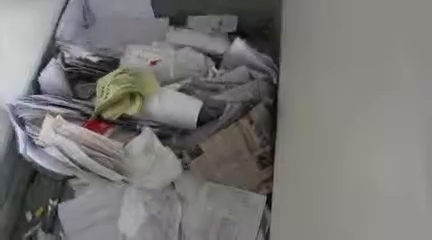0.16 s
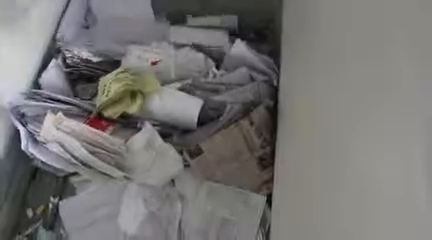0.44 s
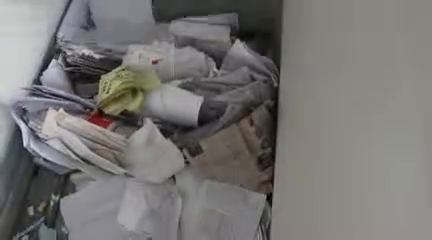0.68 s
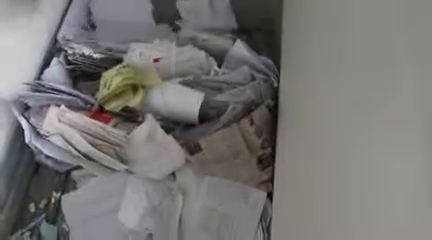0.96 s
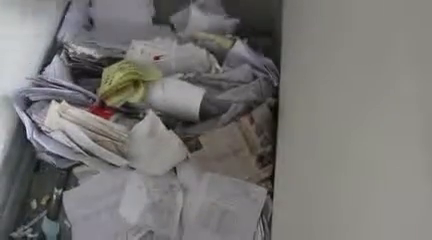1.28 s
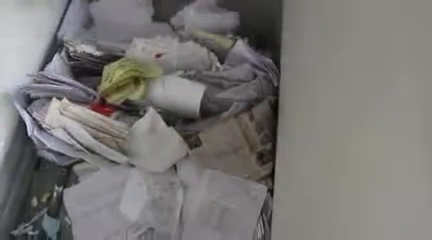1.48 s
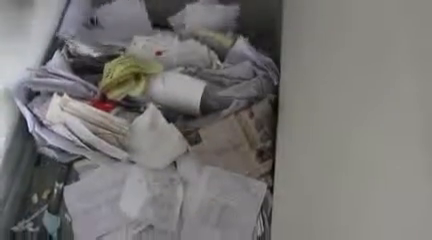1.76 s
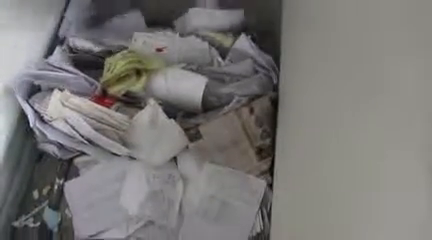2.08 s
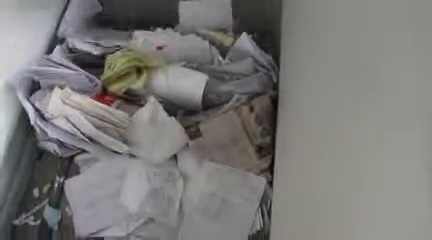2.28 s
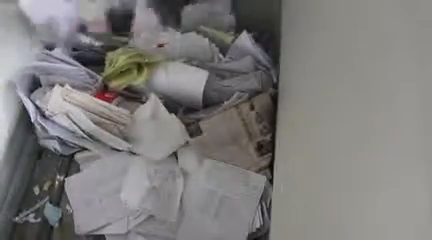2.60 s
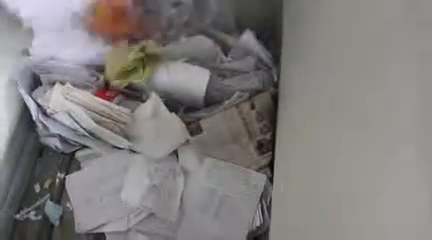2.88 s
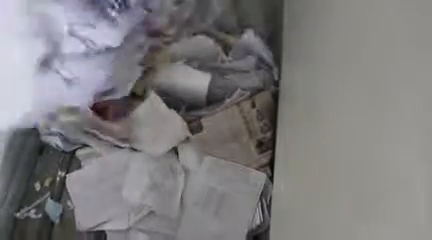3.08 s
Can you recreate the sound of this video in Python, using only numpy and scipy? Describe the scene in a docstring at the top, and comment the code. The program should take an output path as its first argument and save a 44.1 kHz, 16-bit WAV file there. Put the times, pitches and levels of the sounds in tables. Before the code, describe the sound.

An industrial paper shredder roars steadily, crunching and tearing paper over a deep rumbling frame.

```python
"""Factory hall: an industrial paper shredder runs, heard from beside the feed belt, a little to the left.
The drive shakes the steel frame into a rumble, noise that swells in its resonances; short low tones hum in it.
Motor, gears and tearing make a steady broadband roar; the cutters bite in crunches, bursts of random snaps.
A rubbing steel part sings high, friction noise through resonances, swelling about once a second;
paper rustles as high noise, and stiff sheets crack in sudden, decaying bursts of it."""
import sys
import numpy as np
from scipy import signal
from scipy.fft import rfft, irfft, next_fast_len
from scipy.io import wavfile
from scipy.ndimage import uniform_filter1d, map_coordinates

SR = 44100
rng = np.random.default_rng(int(sys.argv[2]) if len(sys.argv) > 2 else 0)


def transcribe(signal):
    """Save signal, clipped to [-1, 1], as a 16-bit WAV file at the path in sys.argv[1]."""
    frames = np.atleast_2d(signal).T
    limited = np.clip(frames, -1, 1)
    pcm = np.round(limited * 32767).astype(np.int16)
    wavfile.write(sys.argv[1], SR, pcm)


def ratio(d):
    """dB to gain"""
    e = np.asarray(d, float) / 20
    return 10 ** e


N = 143325  # samples

# Rubbing over time, before each layer's trim: t/s, singing steel level/dB, paper rustle level/dB
RUBBING = [(0.0, -37, -51), (0.09, -42, -53), (0.32, -33, -49), (0.37, -37.5, -50), (0.9, -48, -59),
           (0.95, -65, -46), (0.96, -40, -51), (1.14, -37.5, -52), (1.52, -35, -49.5), (1.64, -39, -56),
           (1.71, -37.5, -49), (2.04, -55, -58), (2.39, -38.5, -43.5), (3.03, -43, -52), (3.09, -37.5, -55),
           (3.25, -41, -57)]


def unit(x):
    """Normalisation: divide a signal by its root mean square, giving rms 1."""
    return x / np.sqrt(np.mean(x ** 2) + 1e-20)


def along(points, hz):
    """Logarithmic frequency scale: interpolate (f/Hz, value) points along it."""
    f, values = np.transpose(points)
    return np.interp(np.log(hz + 1), np.log(f + 1), values)


def curves(rows):
    """Envelopes: linear interpolation in time, one curve for each column after t/s."""
    seconds, *columns = np.transpose(rows)
    t = np.arange(N) / SR
    return [np.interp(t, seconds, column) for column in columns]


def wobble(rate):
    """Slow random modulation: a spline through Gaussian knots, rate of them a second."""
    knots = rng.standard_normal(int(N * rate / SR) + 4)
    return map_coordinates(knots, [np.arange(N) * rate / SR])


def filtered(x, response):
    """Linear filtering: the spectrum is multiplied by a response of frequency in Hz."""
    size = next_fast_len(N + SR // 2)
    hz = np.fft.rfftfreq(size, 1 / SR)
    return irfft(rfft(x, size) * response(hz), size)[..., :N]


def spread(pair, gain):
    """Interchannel coherence: two unrelated signals are coloured and mixed to left and right of rms 1."""
    # Left-right correlation: f/Hz, correlation (1 = identical)
    likeness = [(40, .93), (120, .97), (250, .95), (700, .86), (1500, .73), (3000, .55), (8000, .36)]

    def mid_side_gain(hz):
        angle = np.arccos(np.clip(along(likeness, hz), -1, 1)) / 2
        return gain(hz) * np.array([np.cos(angle), np.sin(angle)])

    mid, side = filtered(pair, mid_side_gain)
    return unit(np.array([mid + side, mid - side]))


def noise(patchy_db):
    """Nonstationary noise: two channels share random gains over patches of time and frequency."""
    spectra = signal.stft(rng.standard_normal((2, N)), nperseg=512)[2]
    field = rng.standard_normal(spectra.shape[1:])
    field = uniform_filter1d(field, 6, 0)  # across frequency
    field = uniform_filter1d(field, 10, 1)  # across time
    return signal.istft(spectra * ratio(patchy_db * unit(field)), nperseg=512)[1][:, :N]


def peaks(modes):
    """Modal resonance: band-pass responses (centre, width, dB) add in power to one gain."""
    def gain(f):
        power = 0
        for centre, width, db in modes:
            damping = (f * width) ** 2
            power = power + ratio(2 * db) * damping / ((centre ** 2 - f ** 2) ** 2 + damping)
        return np.sqrt(power)
    return gain


def snaps(per_s, spread_db):
    """Impulsive noise: two streams of clicks at random times, with widely scattered sizes."""
    hit = rng.random((2, N)) < per_s / SR
    scatter = ratio(spread_db * rng.exponential(size=(2, N)))
    return unit(hit * rng.standard_normal((2, N)) * scatter)


def steady(x):
    """Short-time power normalisation: part of a narrow noise's chance swells is evened out."""
    window_s, share = 0.12, 0.67  # share 1 would even them fully
    power = uniform_filter1d(np.mean(x ** 2, axis=0), round(window_s * SR))
    return unit(x / (np.abs(power) + 1e-3) ** (share / 2))


def frame():
    """Forced vibration: the drive shakes the frame, whose deep, upper and panel modes swell apart."""
    # Rumble surges: t/s, deep level/dB, upper level/dB
    rumble = [(0.0, -38, -23.5), (0.04, -22.5, -21), (0.15, -25.5, -26), (0.28, -27.5, -28),
              (0.33, -18, -21), (0.54, -28.5, -25), (0.59, -24, -20), (0.69, -17.5, -21.5),
              (0.72, -26, -27.5), (0.94, -24.5, -20.5), (0.97, -20.5, -23), (1.42, -22, -23.5),
              (1.68, -23, -19.5), (1.81, -22.5, -31.5), (1.88, -23, -20), (1.96, -19, -20.5),
              (1.99, -23, -24.5), (2.63, -22.5, -21), (2.73, -27.5, -17.5), (2.81, -24.5, -24.5),
              (3.25, -22, -21)]
    # Rattling panels, before the trim: t/s, level/dB
    rattle = [(0.0, -24.5), (0.27, -28), (0.32, -23), (0.56, -29), (0.63, -25), (0.75, -32), (0.85, -23),
              (2.07, -29), (2.21, -22.5), (2.24, -34), (2.42, -25), (2.43, -22.5), (2.88, -36),
              (3.25, -21.5)]
    # Frame resonances: f/Hz, width/Hz, relative level/dB
    modes = [(60, 10.8, -3.5), (124.3, 9.2, 3.5), (147.4, 12, 5), (175.7, 5.6, 3.5), (214.7, 12.6, -4),
             (238.3, 13.7, -3), (268.7, 34, -2.5), (300.7, 11.2, 2), (317.6, 9.6, 0.5), (431.5, 15, -14),
             (585, 62, -15.5), (746, 12.6, -12), (956.5, 33, -16)]
    split_hz, panel_hz, panel_trim_db = 192, 400, -5.0
    deep_db, upper_db = curves(rumble)
    panel_db, = curves(rattle)
    deep_modes = [m for m in modes if m[0] < split_hz]
    upper_modes = [m for m in modes if split_hz <= m[0] < panel_hz]
    panel_modes = [m for m in modes if m[0] >= panel_hz]
    deep = steady(spread(rng.standard_normal((2, N)), peaks(deep_modes)))
    upper = steady(spread(rng.standard_normal((2, N)), peaks(upper_modes)))
    panels = spread(noise(patchy_db=2.16), peaks(panel_modes))
    return ratio(deep_db) * deep + ratio(upper_db) * upper + ratio(panel_db + panel_trim_db) * panels


def roar():
    """Incoherent superposition: motor, gears and tearing blend into broadband noise."""
    # Colour of the roar: f/Hz, relative density/dB per Hz
    colour = [(250, -33), (420, -1.5), (962, -2), (1430, -5.5), (2970, -6), (4470, -15), (5700, -20),
              (7180, -26), (8010, -27), (10100, -48), (10800, -54), (22000, -120)]
    # Slow course of the roar: t/s, level/dB
    course = [(0.0, -29), (1.07, -27.5), (2.53, -27), (3.25, -28)]
    level_db, = curves(course)
    level_db = level_db + 1.12 * wobble(14)
    return ratio(level_db) * spread(noise(patchy_db=1.84), lambda hz: ratio(along(colour, hz)))


def cutters():
    """Fracture and reverberation: bites snap fibres in fast-rising bursts that ring on in the hall."""
    # Cutter bites, before trim and envelope: t/s, level/dB, decay length of the power/s
    bites = [(0.0, -11.5, 0.041), (0.192, -20.5, 0.01), (0.274, -16.5, 0.14), (0.401, -12.5, 0.038),
             (0.584, -11.5, 0.056), (0.644, -12, 0.031), (0.796, -19, 0.034), (1.0784, -12, 0.019),
             (1.165, -17.5, 0.063), (1.335, -14.5, 0.038), (1.45, -13.5, 0.061), (1.628, -11, 0.048),
             (1.69, -19, 0.11), (1.862, -14, 0.051), (1.946, -15, 0.028), (2.119, -13, 0.06),
             (2.177, -12.5, 0.035), (2.419, -14, 0.09), (2.492, -13, 0.033), (2.572, -11, 0.055),
             (2.689, -12.5, 0.049), (2.828, -18, 0.058), (3.077, -11.5, 0.052), (3.137, -13.5, 0.06),
             (3.188, -14.5, 0.052)]
    # Colour of a bite: f/Hz, relative density/dB per Hz
    colour = [(150, -48), (400, 4), (1000, -1.5), (2200, -2.5), (3000, -1.5), (4300, -11.5), (6000, -17.5),
              (10300, -29), (11000, -76)]
    trim_db, attack_s = -11.5, 0.0036
    snap_share = 0.44  # of the source power; the rest is noise
    hall_t60_s, hall_db = 0.45, -7.5
    t = np.arange(N) / SR
    power = np.zeros(N)
    for start, db, length in bites:
        u = np.maximum(t - start + attack_s, 0)  # rises from one attack time ahead
        rise = (1 - np.exp(-u / attack_s)) ** 2
        power += ratio(2 * (db + trim_db)) * rise * np.exp(-(u / length) ** 2)
    source = np.sqrt(snap_share) * snaps(2800, spread_db=1.75)
    source = source + np.sqrt(1 - snap_share) * noise(patchy_db=1.5)
    direct = np.sqrt(power) * spread(source, lambda hz: ratio(along(colour, hz)))
    tail = rng.standard_normal((2, SR // 2)) * ratio(-60 * t[:SR // 2] / hall_t60_s)
    tail = tail / np.linalg.norm(tail[0])
    return direct + ratio(hall_db) * signal.fftconvolve(direct, tail, axes=1)[:, :N]


def rubbed_steel():
    """Friction-excited resonance: rubbing noise rings the high modes of a steel part."""
    # Modes, before the gain is squared: f/Hz, width/Hz, relative level/dB
    modes = [(4100, 330, -1), (5770, 360, -1), (5623, 75, 2), (6630, 340, -4), (7890, 490, -3)]
    sing_db, _ = curves(RUBBING)
    level = ratio(sing_db + 0.5 + 0.64 * wobble(24.87))  # trim and flutter in dB
    # squaring the gain sharpens the peaks
    return level * spread(noise(patchy_db=0.2), lambda hz: peaks(modes)(hz) ** 2)


def paper():
    """Transient excitation: rustling noise bursts up as stiff sheets crack, then decays exponentially."""
    # Sheet cracks, before the trim: t/s, peak level/dB
    crack_times = [(0.2483, -28.5), (0.5876, -29), (0.9453, -31), (1.4594, -32), (1.771, -30),
                   (2.157, -28.5), (2.3494, -35), (2.582, -29)]
    # Colour of the paper: f/Hz, relative density/dB per Hz
    colour = [(3000, -36), (5000, 3), (7000, -2.5), (9000, 0.5), (10300, -11), (11000, -46)]
    rustle_trim_db, crack_trim_db, crack_t60_s = 6, -5.5, 0.12
    _, rustle_db = curves(RUBBING)
    t = np.arange(N) / SR
    cracks = np.zeros(N)
    for start, db in crack_times:
        cracks += (t >= start) * ratio(db + crack_trim_db - 60 * np.abs(t - start) / crack_t60_s)
    source = rng.standard_normal((2, N)) + 0.24 * snaps(820, spread_db=1.5)
    level = np.hypot(ratio(rustle_db + rustle_trim_db), cracks)  # powers add
    return level * spread(source, lambda hz: ratio(along(colour, hz)))


def hums():
    """Amplitude modulation: short low tones swell and fade within the rumble, equal in both channels."""
    # Brief hums: t/s of the middle, f/Hz, rms level at the middle/dB
    tones = [(0.045, 141.5, -18), (0.6, 298, -20), (1.08, 129.4, -17.5), (1.54, 296.7, -27.5),
             (1.77, 149.3, -21), (1.955, 149.6, -21), (2.48, 291.2, -18.5), (2.62, 298.7, -27)]
    half_length_s = 0.033  # to 1/e of the amplitude
    t = np.arange(N) / SR
    total = np.zeros(N)
    for middle, hz, db in tones:
        swell = np.exp(-((t - middle) / half_length_s) ** 2)
        tone = np.sqrt(2) * np.sin(2 * np.pi * (hz * t + rng.random()))
        total += ratio(db) * swell * tone
    return total


def scene():
    """Superposition and interchannel level difference: all layers add, louder on the left."""
    # Stereo balance: f/Hz, left over right level/dB
    balance = [(60, 1.8), (170, 5.9), (480, 5.5), (1380, 2.8), (3910, 2.7), (11100, 2.4)]
    mix = frame() + roar() + cutters() + rubbed_steel() + paper() + hums()
    sides = np.array([[1], [-1]])
    return filtered(mix, lambda hz: ratio(along(balance, hz) / 2 * sides))


def roll_off(x):
    """The treble ends steeply here."""
    return signal.sosfilt(signal.butter(12, 11700, fs=SR, output="sos"), x)


def record(dry):
    """Band limitation: the deepest bass fades gently and the treble ends steeply near 10.7 kHz."""
    low_hz, top_hz = 48, 10710  # each halves the amplitude there

    def band_limits(hz):
        return hz ** 2 / (hz ** 2 + low_hz ** 2) / (1 + (hz / top_hz) ** 90)

    return roll_off(filtered(dry, band_limits))


dry = scene()
out = record(dry)
transcribe(out)
```